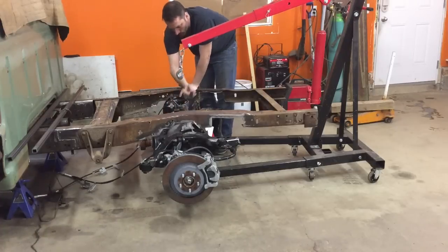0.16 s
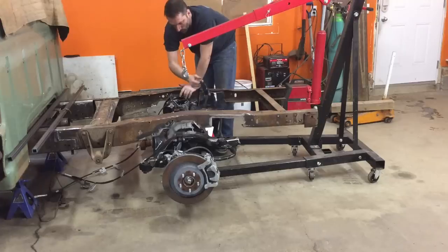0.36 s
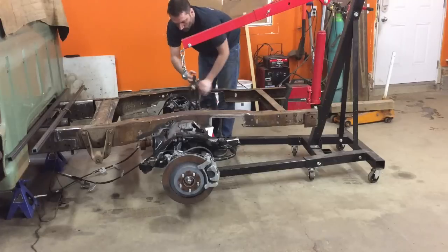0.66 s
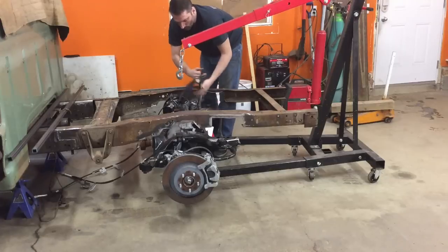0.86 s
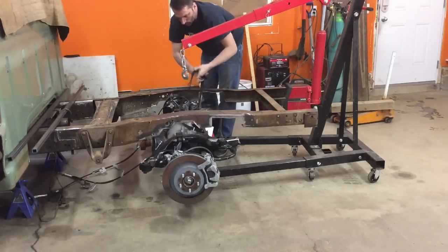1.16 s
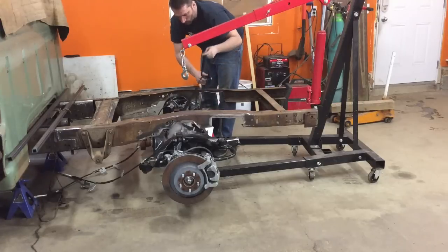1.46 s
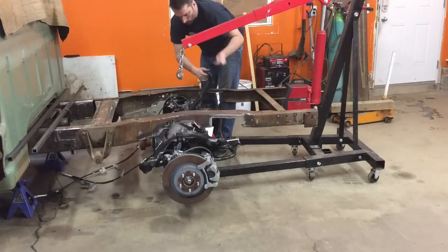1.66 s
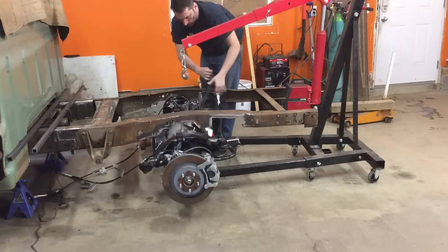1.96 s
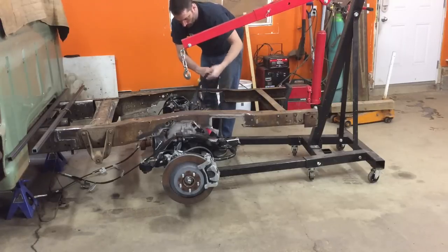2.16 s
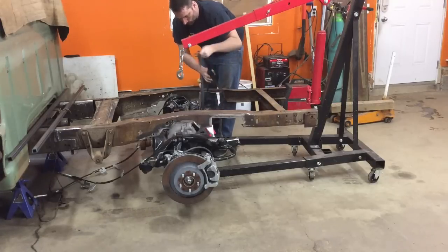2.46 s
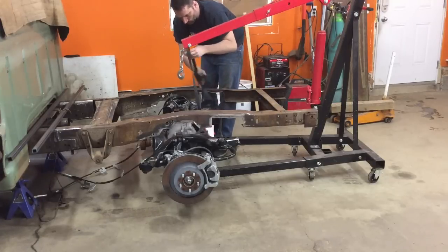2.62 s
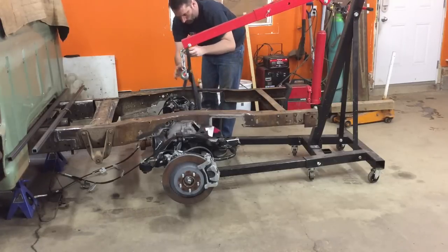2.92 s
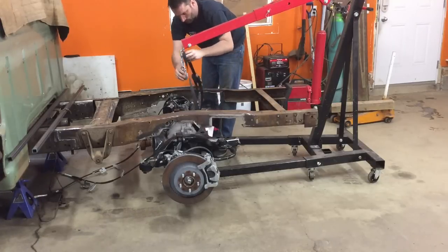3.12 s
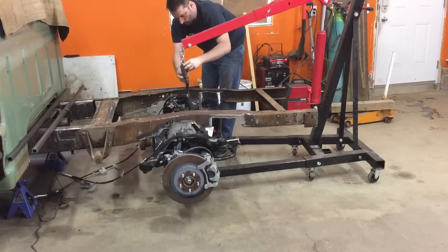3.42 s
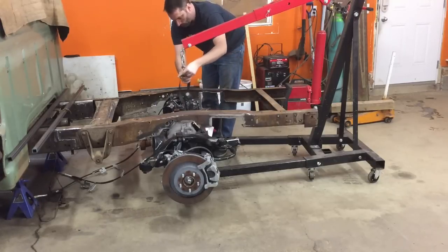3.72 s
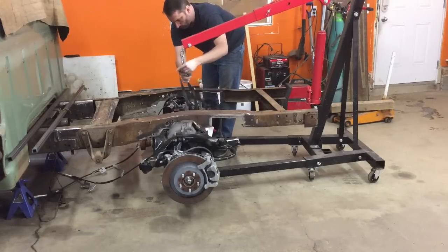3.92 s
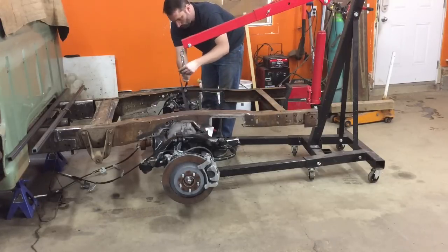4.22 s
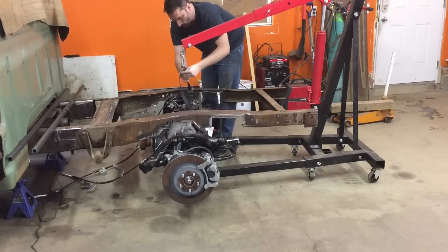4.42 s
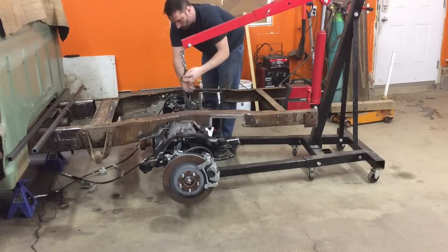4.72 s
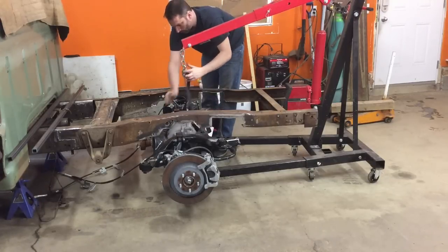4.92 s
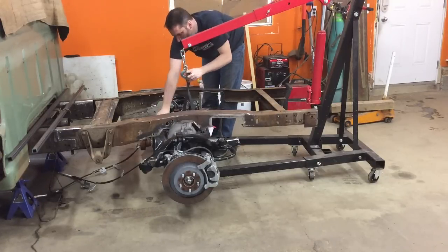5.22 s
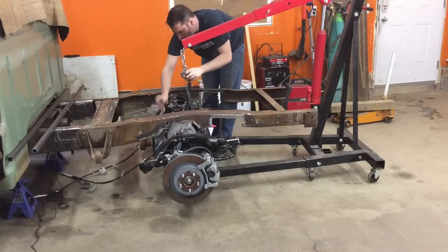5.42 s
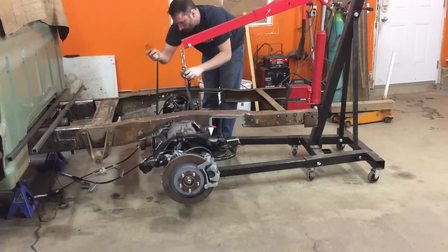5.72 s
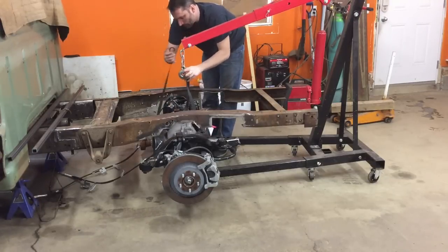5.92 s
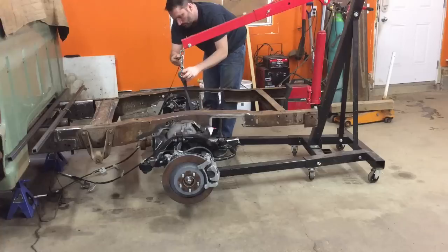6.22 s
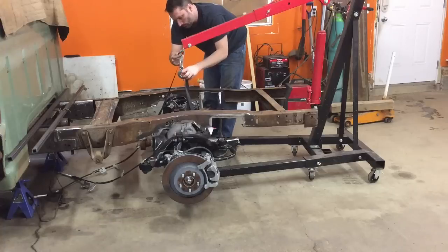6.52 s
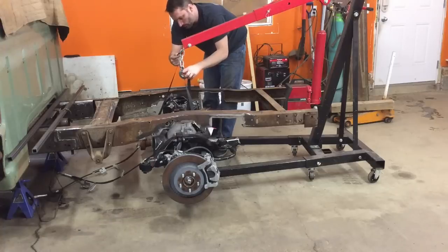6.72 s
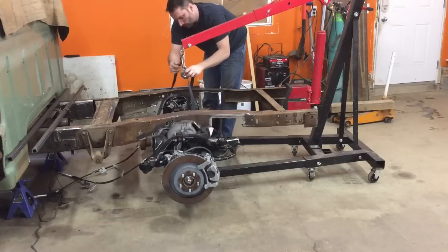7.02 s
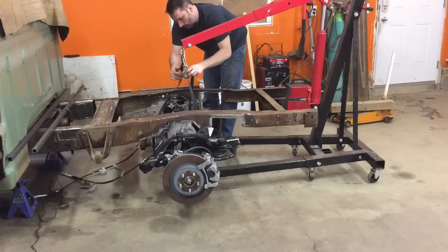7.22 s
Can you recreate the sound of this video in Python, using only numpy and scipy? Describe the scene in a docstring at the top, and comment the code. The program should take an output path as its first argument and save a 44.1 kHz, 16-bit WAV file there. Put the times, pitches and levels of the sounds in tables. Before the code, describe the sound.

A sharp steel clank rings out in a hard-walled garage and fades. Faint clicks follow as a worker fiddles with chain, then a loud clank and rattle, a bright jingling heap of links, and scattered clinks from hook and buckle. After a lull, knocks on a hollow rail, a piercing tick and ringing clanks, then softer clinking. Heard from a few metres away over low hum and hiss.

```python
"""A hard steel clank opens, then chain, hooks and a strap buckle are handled at an engine crane.
The place is a hard-walled garage, the microphone a phone some metres away.
Each knock is a short chatter of contacts; struck parts (beam, legs, hook, links, rail) ring at their own modes.
The garage smears it all into a long tail over a quiet hum and hiss."""
import sys
import numpy as np
from scipy import signal
from scipy.fft import rfft, irfft, next_fast_len
from scipy.io import wavfile
from scipy.ndimage import uniform_filter1d

SR = 44100
rng = np.random.default_rng(int(sys.argv[2]) if len(sys.argv) > 2 else 0)


def store_wav(level_fs):
    """Save 16-bit WAV to argv[1]."""
    pcm = np.round(np.clip(np.atleast_2d(level_fs), -1, 1) * 32767)
    wavfile.write(sys.argv[1], SR, pcm.T.astype(np.int16))


N = 325017  # samples

# Levels of knocks and blows are those at the source, before the garage and the mix.
# knocks of steel on steel [start_s, low_clank_db, low_clank_hz, high_clank_db, high_clank_hz,
# clatter_db, treble_db, chatter_s (limited in clank)]
KNOCKS = [(0.0, -33.5, 2280, -43, 3510, -43.5, -85, 0.0099),
          (0.1498, -38.5, 2560, -41, 6500, -35.5, -51, 0.0038),
          (0.2994, -54, 1660, -75, 2810, -70, -64, 0.0049),
          (0.4984, -64, 2030, -79, 3730, -61.5, -68, 0.037),
          (0.719, -64, 1180, -68, 6700, -65, -67, 0.0094), (1.0429, -59, 2440, -57, 4660, -56, -61, 0.0043),
          (1.1491, -61, 2270, -72, 3980, -60.5, -67.5, 0.037),
          (1.2427, -63, 1870, -60.5, 6270, -60, -60.5, 0.0096),
          (1.3712, -72, 1960, -72, 4240, -60, -61.5, 0.013),
          (1.4682, -63, 1650, -71, 3000, -58.5, -72, 0.013),
          (1.5306, -66, 2410, -71, 3200, -60, -68, 0.035),
          (1.652, -49.5, 1340, -45.5, 3650, -57, -72, 0.029),
          (1.6845, -29, 1460, -41, 3500, -26.5, -42, 0.01), (1.705, -29, 2670, -42, 3440, -25.5, -64, 0.02),
          (1.9631, -44, 1660, -43.5, 2660, -45.5, -79, 0.013),
          (2.1011, -42.5, 1510, -48, 2800, -49.5, -64, .022),
          (2.129, -42.5, 1900, -60, 3010, -49.5, -70, 0.01),
          (2.1908, -44, 2080, -57, 3500, -64, -76, 0.0048), (2.331, -66, 1500, -75, 3130, -63, -71, 0.013),
          (2.398, -42, 2480, -54, 2970, -40.5, -68, 0.018),
          (2.4357, -33.5, 1990, -26, 6200, -41, -39, 0.0079),
          (2.4616, -33.5, 1610, -21, 5900, -24.5, -27, 0.018),
          (2.905, -37, 1530, -31, 5700, -29.5, -32, 0.0085),
          (3.1567, -32, 2230, -50, 2970, -44.5, -81, 0.022),
          (3.26, -42.5, 1490, -58, 2900, -74, -86, 0.025), (3.3293, -40, 2180, -45, 3080, -43.5, -80, 0.01),
          (3.4224, -34, 1410, -45, 2680, -49, -52, .018), (3.652, -43, 1710, -49, 3560, -66, -83, 0.038),
          (3.713, -35.5, 2130, -70, 3900, -68, -76, 0.01), (3.9181, -57, 1860, -63, 2880, -71, -78, 0.009),
          (4.01, -74, 1890, -70, 3830, -70.5, -70, 0.012), (4.376, -64.5, 2070, -65, 3590, -60, -91, .022),
          (4.5639, -56.5, 2270, -65, 3090, -54.5, -60, 0.034),
          (4.600, -38, 1730, -40, 2870, -40, -67, 0.013), (4.6147, -43, 1790, -40.5, 4700, -57, -53, 0.016),
          (4.671, -35.5, 1770, -41, 2880, -48.5, -62, 0.03),
          (4.9847, -34.5, 2500, -24, 4770, -27, -26, 0.0022),
          (5.0845, -32, 2250, -56, 4480, -33.5, -48.5, 0.034),
          (5.2987, -43.5, 1070, -56, 2300, -55, -82, 0.014),
          (5.3788, -45, 1335, -73, 3520, -63, -73, 0.015),
          (5.7348, -62, 1180, -63, 2760, -58.5, -65, 0.033),
          (5.775, -47.5, 2240, -56, 3720, -41.5, -47.5, 0.0044),
          (5.994, -44.5, 1650, -40.5, 3010, -65, -83, 0.017),
          (6.1742, -53.5, 1350, -61, 3200, -61, -64, 0.015),
          (6.2612, -45, 2220, -36.5, 5160, -34, -47.5, 0.013),
          (6.41, -45, 2670, -53, 2960, -51.5, -84, 0.024), (6.649, -39, 1670, -65, 5360, -43.5, -88, 0.013),
          (6.946, -50, 1900, -61, 2960, -78, -94, 0.015), (7.0189, -53, 1780, -61.5, 2830, -75, -90, 0.046),
          (7.079, -39, 1950, -42.5, 3030, -46, -80, 0.016),
          (7.1484, -49, 1810, -48.5, 2850, -58, -67, 0.033),
          (7.2489, -50, 2000, -49, 2720, -68, -62, 0.0079)]
# decay of the garage tail by pitch [pitch_hz, t60_s]
GARAGE_DECAY = [(120, 0.71), (500, 1), (1400, 1.0), (3500, 0.85), (7000, 0.52), (11000, 0.043),
                (15000, 0.067)]
# spectrum of the hiss, relative [pitch_hz, density_db (per Hz)]
HISS_SPECTRUM = [(15, -33), (25, -1.5), (170, -6), (363, -9.5), (714, -14), (796, -17), (1040, -11.5),
                 (1650, -18), (1940, -1), (2550, -20), (5570, -21), (7110, -24), (16000, -30)]
# wavering level of the hum [time_s, level_db (rms)]
HUM_LEVEL = [(0.0, -79), (0.51, -73), (0.7, -79), (0.96, -76), (1.15, -81), (1.76, -65.5), (2.18, -75),
             (2.91, -81.5), (4.02, -73), (4.39, -76.5), (4.78, -74), (4.95, -90), (5.07, -81), (6.01, -93),
             (6.24, -74), (6.49, -80), (6.77, -72), (7.37, -75)]

# Modes: level_db adds to that of the blow; t60_s is limited and the ring faded out in rings().
# bright, very short ticks of steel, mostly above 11 kHz [pitch_hz, level_db, t60_s]
TICK_MODES = [(7400, -3, .02), (11300, 0, .02), (12300, 0, .02), (13300, 0, .02), (14300, -1, .02),
              (15300, -3, .02)]
# ticks [start_s, level_db]
TICK_BLOWS = [(1.373, -65.5), (4.565, -55), (4.614, -47), (4.985, -25), (5.085, -54), (5.775, -53),
              (6.262, -69), (6.651, -78)]
# crane legs and mast [pitch_hz, level_db, t60_s]
LEG_MODES = [(1460, -9.5, .3), (1693, 5.5, .15), (2200, -14, 0.13), (2730, -3, .12), (3150, -11.5, .1),
             (3450, 7, 0.13), (4050, -1.5, .1), (5200, -17, .1), (5900, 5.5, .12), (6950, -0.5, 0.16),
             (7300, -12, .06), (9000, -8.5, .06), (9450, -5, .1)]
# blows on the legs and mast [start_s, level_db]
LEG_BLOWS = [(1.654, -58), (1.683, -33.5), (1.706, -38.5), (3.159, -65)]
# crane beam [pitch_hz, level_db, t60_s]
BEAM_MODES = [(1462, 0, 1.0), (2229, -6, .6), (3440, -8, .4), (3467, -10, .4)]
# blows on the beam [start_s, level_db]
BEAM_BLOWS = [(1.684, -44), (2.101, -55), (2.46, -59), (2.905, -63), (3.16, -49.5), (3.425, -61),
              (3.711, -50.5), (3.80, -66), (5.083, -43.5), (5.38, -61)]
# dull thump of the heavy chassis [pitch_hz, level_db, t60_s]
CHASSIS_MODES = [(122, 0.5, .12), (156.5, 2.5, .1), (250, -7.5, 0.065), (342, 1, 0.038), (468, 6, 0.03),
                 (561, -0.5, 0.055), (693, -1.5, 0.0413)]
# blows on the chassis [start_s, level_db]
CHASSIS_BLOWS = [(1.70, -44.5), (2.436, -42.5), (2.46, -42), (2.905, -45.5), (5.775, -62), (6.301, -72),
                 (6.431, -72), (6.651, -54)]
# chain link [pitch_hz, level_db, t60_s]
LINK_MODES = [(7700, -5, .05), (9400, -6, .09), (10800, 0, .08), (13050, -4, .05), (14450, 1, .08)]
# blows on the link [start_s, level_db]
LINK_BLOWS = [(2.401, -48), (3.423, -56), (3.713, -58)]
# heap of slack chain [pitch_hz, level_db, t60_s]
HEAP_MODES = [(3360, 1, .1), (4300, -1, 0.102), (4455, -2.5, 0.097), (5140, 1, 0.1), (5250, -2.5, 0.121),
              (5430, 5, 0.11), (5970, -6, .12), (5885, -8, .12), (5790, -9, 0.1), (6140, 13, 0.11),
              (6280, -8, 0.13), (6514, -10, 0.13), (6930, 4, .12), (6810, -6, 0.123), (8670, 5, 0.072),
              (9650, -7.5, .07)]
# blows on the heap [start_s, level_db]
HEAP_BLOWS = [(2.436, -46), (2.46, -32), (2.479, -33.5)]
# hook [pitch_hz, level_db, t60_s]
HOOK_MODES = [(5590, 2, .55), (5450, -5, .7), (8600, -2, .1), (11500, -8, .04), (2800, -3, .1),
              (4000, -6, .12)]
# blow on the hook [start_s, level_db]
HOOK_BLOWS = [(2.904, -41)]
# pin [pitch_hz, level_db, t60_s]
PIN_MODES = [(4150, -3, .03), (4750, -2, .03), (5300, -4, .03), (8600, 0, .06), (10700, -8, .04),
             (11500, -8, .04), (13000, -6, .04)]
# blows on the pin [start_s, level_db]
PIN_BLOWS = [(3.329, -52), (3.424, -57), (4.985, -47)]
# strap buckle [pitch_hz, level_db, t60_s]
BUCKLE_MODES = [(1896, -3, 0.13), (1733, -9, .12), (1510, -11, 0.18), (2940, -16, 0.062)]
# blows on the buckle [start_s, level_db]
BUCKLE_BLOWS = [(3.918, -38), (4.009, -61), (4.602, -41), (4.671, -46), (6.948, -43.5), (7.08, -38)]
# hollow chassis rail [pitch_hz, level_db, t60_s]
RAIL_MODES = [(343.4, 3, 0.22), (402.2, 4.5, 0.19), (600, -2, 0.099), (806, -16, 0.11), (922, -5, .1)]
# blows on the rail [start_s, level_db]
RAIL_BLOWS = [(4.60, -48.5), (4.69, -47.5), (4.76, -58), (4.86, -54.5), (6.301, -62.5), (6.66, -53.5),
              (7.091, -64)]
# lifting bracket [pitch_hz, level_db, t60_s]
BRACKET_MODES = [(995, 4.5, 0.15), (1353, -11, 0.13), (1610, -8, 0.11), (2070, -1, 0.29), (2280, 2.5, 0.15),
                 (5520, -4, 0.067)]
# blows on the bracket [start_s, level_db]
BRACKET_BLOWS = [(5.083, -47), (5.30, -48), (6.651, -54), (6.698, -58)]
# shackle [pitch_hz, level_db, t60_s]
SHACKLE_MODES = [(1247, -3, 0.11), (2078, 0.5, .08), (2450, -1, 0.11), (3020, -5, 0.18), (3800, -20, .08),
                 (4360, 5, 0.12), (5950, -1, 0.07)]
# blows on the shackle [start_s, level_db]
SHACKLE_BLOWS = [(6.263, -41), (6.411, -62)]

KNOCK_SIZE = 4096  # samples
LOW_WIDE, HIGH_WIDE, BODY_WIDE = 0.51, 0.47, 2.3  # width of each resonance as a share of its pitch
BODY_HZ, BODY_DB, THUD_DB = 1070, -3.5, -25  # body and thud levels follow the low clank
SPARKLE_DB = -4  # top octave against the treble
FIRST_DB = 13.5  # boost of the first contact
TAIL_DB, EARLY_DB = 3.5, -9.5  # tail energy and strongest possible echo against the direct sound
HISS_DB, HUM_HZ = -67, 68.3  # rms level; middle pitch
SPLIT, FREE_T60_S = 0.0176, 0.176  # mode scatter (share of pitch); less in parts that ring longer than this
SWELL_CYCLES = 1.11  # time constant of a ring's build-up
MIC_DIP_HZ, MIC_DIP_WIDTH_HZ, MIC_DIP_DEPTH = 10400, 800, .5  # depth: share taken out at the centre
MIC_LOW_HZ, TOP_HZ = 55, 15900


def clank(row):
    """One knock: a first contact and a swarm of dying bounces, heard through the short rings of touching parts."""
    _, low_db, low_hz, high_db, high_hz, clatter_db, treble_db, chatter_s = row
    t = np.arange(KNOCK_SIZE) / SR / np.clip(chatter_s, .002, .03)  # in chatter times
    bounces = undb(2.0 * rng.exponential(size=len(t)))
    bounces = bounces * (rng.random(len(t)) < .15)
    envelope = np.exp(-t) * (1 - np.exp(-t / 0.22))
    contacts = rng.standard_normal(len(t)) * (bounces + 0.23) * envelope
    contacts[1:4] += undb(FIRST_DB) * np.array([.5, -1, .5])  # a hard, thin tick
    contacts = peak(even(contacts, size=40), 0)
    parts = [  # pitch_hz, width_hz, level_db
        (low_hz, LOW_WIDE * low_hz, low_db),
        (high_hz, HIGH_WIDE * high_hz, high_db),
        (125, 170, low_db + THUD_DB),
        (BODY_HZ, BODY_WIDE * BODY_HZ, low_db + BODY_DB),
        (3300, 4500, clatter_db),
        (8400, 4000, treble_db),
        (13200, 6000, treble_db + SPARKLE_DB)]
    power = 0
    for hz, width_hz, db in parts:  # unrelated parts add in power
        shape = np.abs(resonance(len(t), hz, width_hz, order=3)) ** 2
        power = power + undb(2 * db) * shape / shape.mean()
    body = causal(np.sqrt(power + 1e-16))  # the floor keeps the logarithm finite
    return irfft(rfft(contacts) * body, len(t))


def garage(dry):
    """Direct sound, floor and wall echoes, then a dense tail with its own decay in each half octave."""
    t = np.arange(1 << 16) / SR
    hz, t60 = np.transpose(GARAGE_DECAY)
    tail = 0
    for centre_hz in 2 ** np.arange(6, 14.3, .5):
        decay = 1000 ** (-t / np.interp(np.log(centre_hz), np.log(hz), t60))
        noise = band(rng.standard_normal(len(t)), centre_hz, centre_hz * 0.31, order=2)
        tail = tail + noise * decay
    crowding = 1 - np.exp(-t / 0.0095)  # echoes need time to crowd
    tail = even(tail * crowding, size=300)[:-4096]
    tail *= undb(TAIL_DB) / np.sqrt(np.sum(tail ** 2))
    early = np.zeros(4096)
    early[0] = 1  # direct sound
    lags_s = rng.uniform(.002, .035, 24)
    echoes = undb(EARLY_DB) * rng.choice([-1, 1], size=24) * np.exp(-lags_s / 0.036)
    early[(lags_s * SR).astype(int)] += echoes
    return signal.oaconvolve(dry, early)[:N] + signal.fftconvolve(dry, tail)[:N]


def building_hiss():
    """Soft hiss of the building: noise in half-octave bands that flicker gently and swell slowly together."""
    hz, density_db = np.transpose(HISS_SPECTRUM)
    hiss, swell = 0, walk(0.22)
    for centre_hz in 2 ** np.arange(5.25, 14.3, .5):
        band_db = np.interp(np.log(centre_hz), np.log(hz), density_db) + 10 * np.log10(centre_hz)
        flicker_db = band_db + 0.63 * swell + 0.55 * walk(8.1)
        noise = band(rng.standard_normal(next_fast_len(N)), centre_hz, centre_hz * 0.58, order=2)[:N]
        hiss = hiss + undb(flicker_db) * level(noise, 0)
    return level(hiss, HISS_DB)


def hum():
    """A low sine that wavers in pitch and level."""
    time_s, level_db = np.transpose(HUM_LEVEL)
    pitch_hz = HUM_HZ + 2.39 * walk(1.7)
    tone = np.sin(2 * np.pi * np.cumsum(pitch_hz) / SR) * np.sqrt(2)  # unit rms
    return tone * undb(np.interp(np.arange(N) / SR, time_s, level_db))


def rings(modes, blows, scatter_db):
    """Every blow lands on another spot, so it feeds the same modes, each a beating cluster, in other shares."""
    out = np.zeros(N + SR)
    hz, mode_db, t60 = np.transpose(modes)
    t60 = np.clip(t60, .02, 1)
    t = np.arange(int(min(t60.max(), .5) * SR))[:, None] / SR
    closing = np.cos(np.pi * t) ** 2  # silent by half a second
    build_up = 1 - np.exp(-t * hz / SWELL_CYCLES)
    fade = 1000 ** (-t / t60) * closing * build_up
    # uneven steel splits each mode into close neighbours
    spread_hz = SPLIT * hz * np.minimum(FREE_T60_S / t60, 1) ** 2 + 2 / t60
    cluster = 0
    for _ in range(5):
        neighbour_hz = hz + spread_hz * rng.standard_normal(len(hz))
        cluster = cluster + np.sin(2 * np.pi * (neighbour_hz * t + rng.random(len(hz))))
    ring = fade * cluster
    # the energy of one plain mode
    ring = ring * np.sqrt(np.sum(fade ** 2, axis=0) / np.sum(2 * ring ** 2, axis=0))
    for start_s, blow_db in blows:
        start = int(start_s * SR)
        gains = undb(mode_db + blow_db + scatter_db * rng.standard_normal(len(hz)))
        out[start:start + len(t)] += ring @ gains
    return out[:N]


def chain():
    """All knocks, with the ticks and the rings of the steel parts that they strike."""
    out = np.zeros(N + KNOCK_SIZE)
    for row in KNOCKS:
        start = int(row[0] * SR)
        out[start:start + KNOCK_SIZE] += clank(row)
    steel = [(TICK_MODES, TICK_BLOWS), (LEG_MODES, LEG_BLOWS), (BEAM_MODES, BEAM_BLOWS),
             (CHASSIS_MODES, CHASSIS_BLOWS), (LINK_MODES, LINK_BLOWS), (HEAP_MODES, HEAP_BLOWS),
             (HOOK_MODES, HOOK_BLOWS), (PIN_MODES, PIN_BLOWS), (BUCKLE_MODES, BUCKLE_BLOWS),
             (RAIL_MODES, RAIL_BLOWS), (BRACKET_MODES, BRACKET_BLOWS), (SHACKLE_MODES, SHACKLE_BLOWS)]
    return out[:N] + sum(rings(modes, blows, scatter_db=1.2) for modes, blows in steel)


def undb(db):
    """Gain of a level in dB."""
    return 10 ** (np.asarray(db) / 20)


def level(x, db):
    """Scale to an rms level."""
    return x * undb(db) / np.sqrt(np.mean(x ** 2))


def peak(x, db):
    """Scale the loudest few milliseconds to an rms level."""
    return x * undb(db) / np.sqrt(uniform_filter1d(x ** 2, size=256).max())


def walk(rate):
    """Random levels held 1 / rate s and slewed twice; spread near 1."""
    k = int(SR / rate)
    steps = np.repeat(rng.standard_normal(N // k + 1), k)
    return 1.253 * uniform_filter1d(uniform_filter1d(steps, k), k)[:N]


def resonance(size, hz, width_hz, order):
    """Response of a damped resonance, applied several times for steeper flanks."""
    f = np.fft.rfftfreq(size, 1 / SR) + 1e-3  # never divides by zero
    return (1 + 1j * (f - hz ** 2 / f) / width_hz) ** -order


def band(x, hz, width_hz, order=1):
    """Sound passed through a resonance."""
    return irfft(rfft(x) * resonance(len(x), hz, width_hz, order), len(x))


def even(x, size):
    """Level out the coarse bumps of a spectrum and keep its fine grain."""
    spectrum = rfft(x)
    return irfft(spectrum / np.sqrt(uniform_filter1d(np.abs(spectrum) ** 2, size)), len(x))


def causal(gain):
    """Give a gain curve the phase of a body that rings only after it is struck."""
    cepstrum = irfft(np.log(gain))
    cepstrum[1:len(cepstrum) // 2] *= 2
    cepstrum[len(cepstrum) // 2 + 1:] = 0
    return np.exp(rfft(cepstrum))


def scene():
    """Chain in its garage over the hiss and hum."""
    return (undb(-6.0) * garage(chain()) + building_hiss() + hum())[None]


def record(dry):
    """The phone's port loses the deepest bass and has a dip in the treble; the top is cut."""
    port = signal.lfilter(*signal.iirpeak(MIC_DIP_HZ, MIC_DIP_HZ / MIC_DIP_WIDTH_HZ, SR), dry)
    dipped = dry - MIC_DIP_DEPTH * port
    bass_cut = signal.butter(3, MIC_LOW_HZ, "high", fs=SR, output="sos")
    top_cut = signal.ellip(10, .2, 70, TOP_HZ, fs=SR, output="sos")
    return signal.sosfilt(top_cut, signal.sosfilt(bass_cut, dipped))


dry = scene()
out = record(dry)
store_wav(out)
```